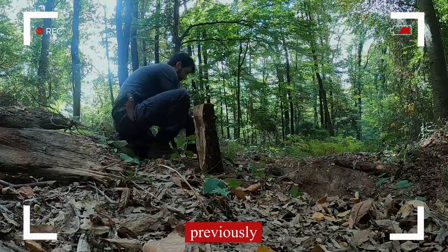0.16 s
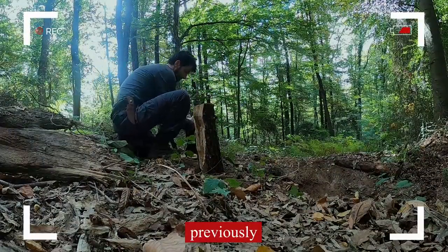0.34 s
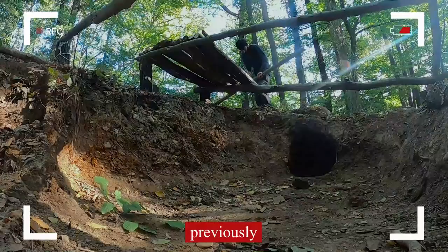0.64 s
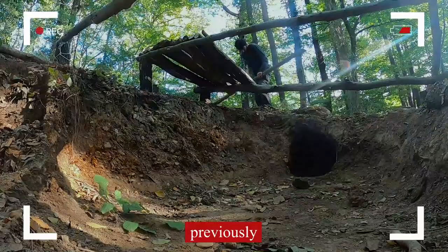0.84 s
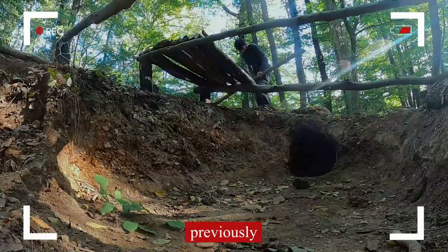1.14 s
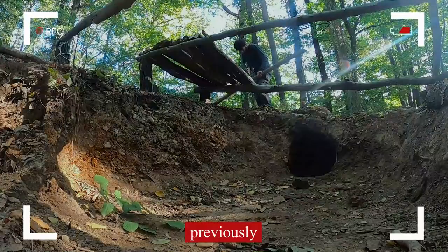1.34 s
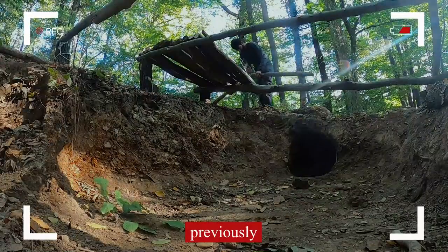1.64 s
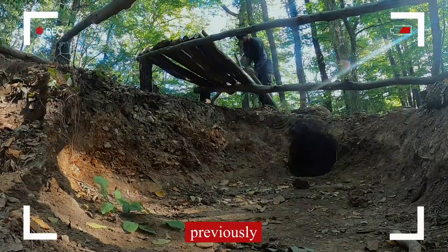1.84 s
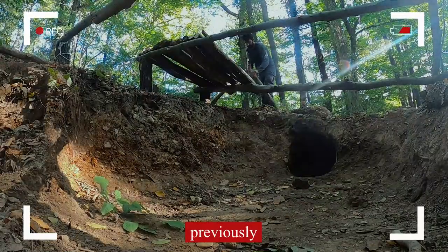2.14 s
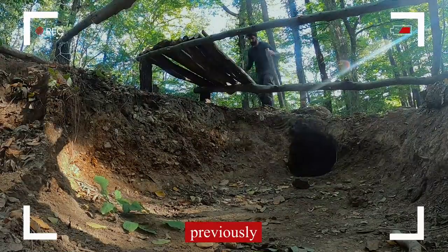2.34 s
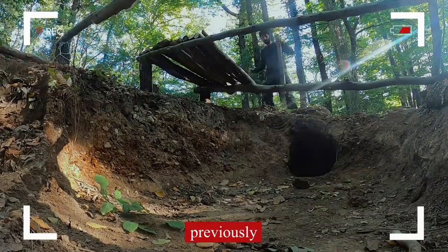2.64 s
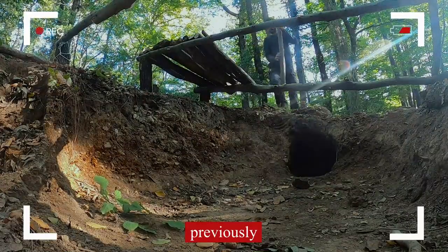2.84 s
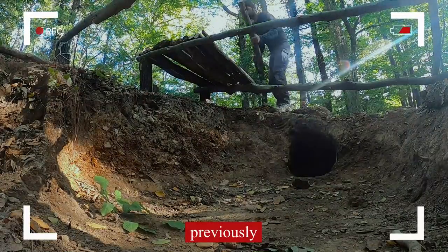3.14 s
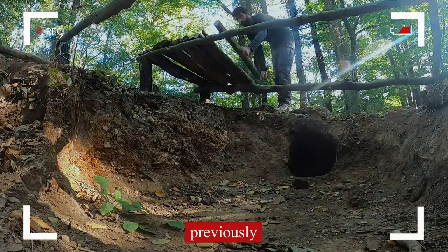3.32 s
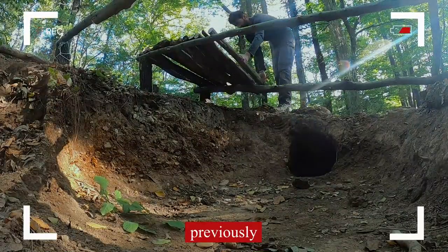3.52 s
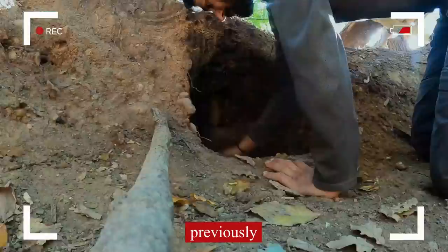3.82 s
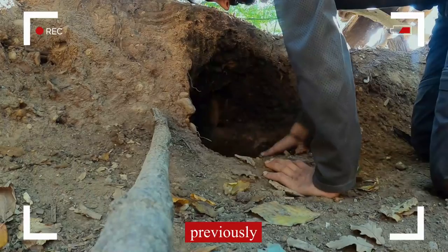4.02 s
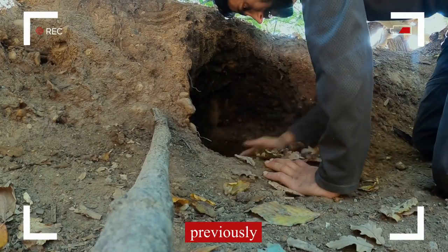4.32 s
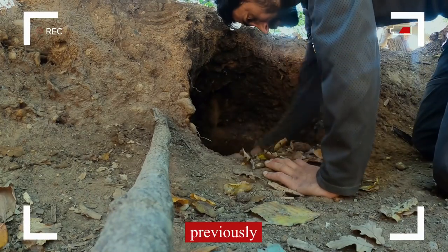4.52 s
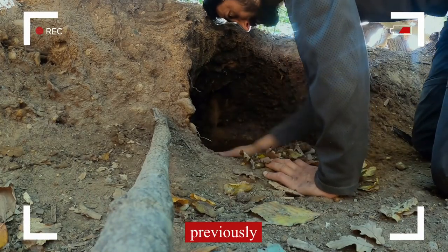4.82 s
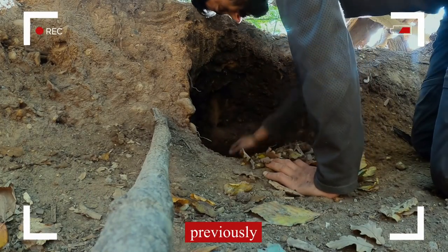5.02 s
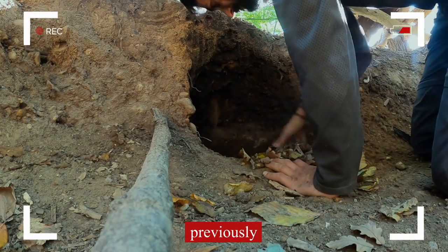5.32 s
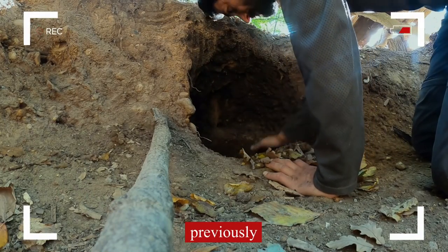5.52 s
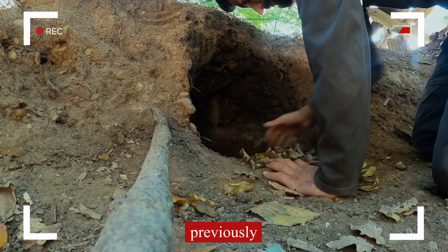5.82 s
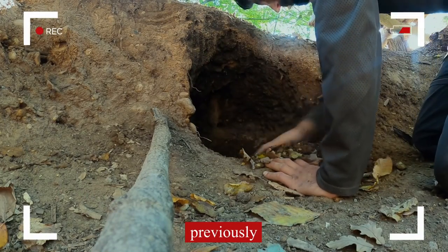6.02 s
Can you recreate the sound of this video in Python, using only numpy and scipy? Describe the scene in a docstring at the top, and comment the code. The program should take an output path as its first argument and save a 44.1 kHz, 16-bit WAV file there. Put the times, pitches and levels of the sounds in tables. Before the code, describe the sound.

After one dull thud come rhythmic gritty scrapes on a stick, wind slaps and wooden knocks, then close crackling scoops of leaves and earth.

```python
"""Forest, at a dug shelter: a log thuds down, then a blade scrapes to and fro over a stick in torn-fibre grit
while a breeze rumbles and slaps the left microphone port; a footfall and soft dull taps are damped modes too.
Poles knock on a wooden frame as damped modes plus a noise crack. Then, close by, a hand scoops dry leaves and
soil out of an earth hollow: clustered grit, snaps and dropping clods. Coloured noise gives the air of each place."""
import sys
import numpy as np
from scipy import signal
from scipy.fft import rfft, irfft
from scipy.io import wavfile
from scipy.ndimage import uniform_filter1d

SR = 44100
rng = np.random.default_rng(int(sys.argv[2]) if len(sys.argv) > 2 else 0)


def wav_record(signal):
    """Record a signal, one row per channel, as 16-bit PCM in the file named by sys.argv[1]."""
    frames = np.transpose(np.atleast_2d(signal))
    bounded = np.clip(frames, -1, 1)
    # unit amplitude maps onto the largest positive 16-bit level
    quanta = np.round(bounded * 32767).astype(np.int16)
    wavfile.write(sys.argv[1], SR, quanta)


N = 271598
TIME_S = np.arange(N) / SR

# levels are relative within each layer; colours are per Hz
# blade strokes, push and return: t/s, push level/dB, return level/dB, length/s
STROKE_ROWS = [(0.568, -29, -39.5, 0.028), (0.707, -34.5, -47, 0.03), (0.854, -31, -40.5, 0.028),
               (0.995, -31.5, -37, 0.031), (1.136, -33.5, -41.5, 0.031), (1.28, -32.5, -36.5, 0.03),
               (1.435, -28.5, -34.5, 0.026), (1.584, -37, -55, 0.025), (1.73, -34.5, -49, 0.027),
               (1.951, -45, -47, 0.023), (2.128, -37, -46.5, 0.019), (2.28, -42, -63, 0.02)]
# rub between strokes: t/s, level/dB
DRAG_ROWS = [(0.56, -51.5), (1.2, -56.5), (1.4, -51), (1.7, -47.5), (1.76, -62), (2.1, -54.5), (2.35, -68)]
# blade hiss colour: f/Hz, level/dB
BLADE_COLOUR = [(1500, -38), (2600, -10.5), (3600, -3.5), (4300, 2), (5100, 4.5), (5700, 0), (6400, 3.5),
                (7200, -1), (9000, -1), (11000, 0.5), (12500, -7.5), (16000, -21)]
# resonances of blade and stick: f/Hz, level/dB
RING_COLOUR = [(1000, -26), (1220, -13), (1390, -3), (1560, -11.5), (2600, -24), (3200, -11), (3580, -2),
               (4100, -4), (6000, -23.5)]
# stick body colour: f/Hz, level/dB
STICK_COLOUR = [(250, -2), (380, 2), (600, -3), (760, 6.5), (850, 6), (1050, -0.5), (1280, -5), (1550, -4),
                (2000, -4), (2700, -11), (4000, -20)]
# faint rustles by the frame, then hand sweeps through leaves and soil: t/s, level/dB, length/s
SWEEP_ROWS = [(2.687, -50, 0.084), (2.942, -57.5, 0.15), (3.18, -55, 0.093), (3.887, -46.5, 0.025),
              (3.944, -36, 0.025), (4.029, -43, 0.032), (4.116, -48, 0.028), (4.195, -49.5, 0.029),
              (4.288, -44.5, 0.031), (4.409, -46, 0.029), (4.446, -45.5, 0.037), (4.718, -39, 0.038),
              (4.766, -54.5, 0.064), (4.833, -54, 0.037), (4.902, -60, 0.048), (5.022, -56.5, 0.053),
              (5.157, -56.5, 0.049), (5.258, -48.5, 0.025), (5.471, -52, 0.022), (5.645, -62, 0.04),
              (5.74, -63, 0.06), (5.846, -58.5, 0.051), (5.93, -43.5, 0.056), (6.05, -50.5, 0.068),
              (6.146, -44, 0.057)]
# rustle of a dragged handful of leaves: t/s, level/dB
HANDFUL_ROWS = [(3.87, -56), (4.25, -61), (4.32, -49), (4.39, -59), (4.5, -54.5), (4.68, -54.5), (4.8, -59),
                (4.95, -77), (5.4, -63.5), (6.15, -68)]
# dry leaf colour: f/Hz, level/dB
LEAF_COLOUR = [(500, -3), (1200, -6.5), (2300, -2.5), (3300, -5), (5200, 0.5), (7500, -0.5), (10500, 0.5),
               (13000, 0.5), (16000, -7)]
# soil rub colour: f/Hz, level/dB
SOIL_COLOUR = [(200, -1.5), (400, 4.5), (800, 6.5), (1100, -9), (1450, -7), (2100, -13.5), (3200, -18.5),
               (6000, -12)]
# snapping fibres and leaf stalks: t/s, level/dB
SNAP_ROWS = [(0.5623, -12.5), (0.762, -17.5), (0.9851, -15), (1.1154, -18.5), (1.1834, -25), (1.5579, -29),
             (1.615, -31), (1.8598, -23), (1.8896, -21.5), (2.018, -31), (2.078, -29), (3.9355, -28),
             (4.2334, -30.5), (4.5484, -27.5), (4.6646, -29), (5.2131, -37), (6.0428, -26)]
# dropping crumbs and pats on the ground: t/s, level/dB
CLOD_ROWS = [(1.881, -40.5), (2.079, -34), (4.161, -38), (4.382, -36), (4.624, -41), (4.898, -40),
             (5.034, -36), (5.283, -39.5), (5.379, -41), (5.816, -45), (5.969, -44), (6.095, -43)]
# pat on packed earth, colour: f/Hz, level/dB
EARTH_COLOUR = [(200, -7), (420, -5), (680, 9), (900, -4), (1100, -7), (1450, -12), (2100, -17),
                (3200, -24), (6000, -22)]
# pole on frame: t/s, level/dB, pitch factor, crack level/dB, low-mode level/dB, contact cutoff f/Hz
KNOCK_ROWS = [(1.8911, -33, 0.8, 4, -18, 3000), (2.384, -38.5, 0.77, 5.5, -7, 3970),
              (2.427, -18.5, 0.73, 0.5, 1, 1500), (3.498, -23.5, 1.0, 2, 9, 2500),
              (3.509, -29.5, 1, 0, 3, 6000), (3.5223, -5.5, 0.97, -5.5, -3.5, 3370),
              (3.7405, -27.5, 1.0, 5, 5, 9000), (3.769, -26, 0.79, 4.5, -20, 12000),
              (3.776, -17, 0.93, -0.5, 6.5, 12200), (3.7806, -11, 1.03, -8.5, -3, 2600)]
# pole modes at pitch factor 1: f/Hz, level/dB, t60/s
POLE_MODES = [(237, -4, 0.061), (370, -17, 0.092), (540, -11, 0.034), (757, -3, 0.024), (783, -8, 0.05),
              (844, -4.5, 0.038), (1060, -2, 0.006), (1430, -20, 0.018), (1720, -9, 0.032), (1980, 0, 0.04),
              (2002, 5, 0.011), (2400, -21, 0.033), (2950, -12.5, 0.022), (3440, -10.5, 0.03),
              (3750, -4.5, 0.012), (4550, -40, .016), (4970, -25, 0.023)]
# contact crack colour: f/Hz, level/dB
CRACK_COLOUR = [(200, -0.5), (800, 7.5), (3700, -9.0), (4500, -8.5), (9000, -14), (16000, -10)]
# a log thud, then a footfall and soft dull taps: t/s, level/dB, pitch factor, tick level/dB
THUD_ROWS = [(0.1505, -10.5, 1.02, -16.5), (2.1907, -23.5, 1.85, -17), (2.3904, -27.5, 1.12, -30),
             (3.172, -27, 1.47, -18)]
# thud modes at pitch factor 1: f/Hz, level/dB, t60/s
THUD_MODES = [(163, -11, 0.043), (255, -1, 0.034), (322, -7, 0.041), (426, -7.5, 0.025),
              (840, -19.5, 0.025), (1550, -38, 0.014)]
# thud tick colour: f/Hz, level/dB
TICK_COLOUR = [(500, 9), (2000, 4.5), (2600, -2.5), (6000, -4.0), (16000, -15)]
# air slaps on the left port: t/s, level/dB, swing f/Hz
BUFFET_ROWS = [(1.383, -5, 149), (1.408, -14.5, 180), (1.513, -11, 142), (1.558, -9.5, 119),
               (1.974, -5, 152), (1.989, -6.5, 129), (1.997, -11, 190), (2.028, -9, 192),
               (2.192, -9.5, 204), (2.337, -13, 130), (2.389, -8.5, 172)]
# slap colour: f/Hz, level/dB
SLAP_COLOUR = [(100, -1), (400, 5.5), (700, -3.0), (2000, -43.0)]
# gusts on the ports: t/s, level/dB, length/s
GUST_ROWS = [(1.41, -29.5, 0.24), (1.57, -29.5, 0.23), (1.82, -31, 0.085), (2.0, -29, 0.13),
             (2.19, -27, 0.18), (2.4, -29, 0.087), (2.6, -38.5, 0.077), (2.9, -40, 0.068), (3.5, -41, 0.08),
             (3.715, -31.5, 0.088)]
# wind rumble colour: f/Hz, level/dB
WIND_COLOUR = [(20, -40), (45, -2), (80, 3.5), (130, 2), (200, 1.5), (300, -6), (500, -27), (1000, -37),
               (2500, -46)]
# air by the log, colour: f/Hz, level/dB
FOREST_COLOUR = [(18, -50), (30, -17), (225, 6), (996, -9.5), (1170, -10), (1290, -11), (2070, -16.5),
                 (2550, -21.5), (3880, -17), (5310, -17.5), (8280, -17), (11600, -20.5), (15500, -25)]
# air by the frame, colour: f/Hz, level/dB
FRAME_COLOUR = [(18, -19), (30, -32), (81, -1.5), (197, -1.5), (237, -5.5), (277, -9.5), (307, -11.5),
                (467, -15.5), (787, -23), (1020, -27), (1770, -36), (2360, -43.5), (3980, -38),
                (15500, -42)]
# air in the hollow, colour: f/Hz, level/dB
HOLLOW_COLOUR = [(18, -62), (30, -20.5), (77, -13.5), (140, 0.5), (237, -0.5), (369, -6.5), (505, -18),
                 (874, -20.5), (1110, -30), (1330, -24.5), (1720, -35), (2760, -40.5), (3590, -44),
                 (7460, -40), (15500, -44)]
# low rumble around the frame: t/s, level/dB
RUMBLE_ROWS = [(.56, -38.5), (.85, -39), (1.0, -45), (1.2, -43.5), (1.45, -39.5), (1.9, -45.5), (2.5, -44),
               (3.05, -43), (3.86, -41.5)]
# dull rumble of movement in the hollow: t/s, level/dB
STIR_ROWS = [(3.88, -44), (4.4, -48.5), (4.56, -44.5), (4.75, -45), (5.0, -47), (5.15, -44), (5.82, -44.5),
             (5.93, -41.5), (6.15, -44.5)]
# side against mid, close sources: f/Hz, level/dB
PORT_WIDTH = [(60, -8), (250, -21), (1200, -23), (2400, -33), (4400, -3.5), (8000, -6.5), (15000, 2)]
# side against mid, background: f/Hz, level/dB
BACKGROUND_WIDTH = [(60, -17), (200, -28), (380, -24), (700, -15.5), (1300, -14.5), (2400, -15), (4400, -6),
                    (8000, -3), (15000, -2.5)]
# width of the background air: t/s, level/dB
AIR_WIDTH_ROWS = [(3.86, 3.5), (3.9, -33), (4.4, -7), (4.9, -2.5), (6.1, 2.5)]

FRAME_S, HOLLOW_S = 0.555, 3.87  # start by the frame, start in the hollow
TOP_HZ = 16000
STROKE_RISE, RETURN_RISE, SWEEP_RISE, GUST_RISE = 0.62, 0.53, 0.35, 0.44  # share of length spent swelling
RETURN_S, RETURN_STRETCH = 0.064, 0.85  # return delay after push; return length / push length
STICK_PUSH_DB, STICK_RETURN_DB = -8, -13.5  # wood envelope re blade
RING_DB, RING_FOLLOW = -19.5, 0.71  # ring at a 0 dB stroke; dB of ring per dB of stroke
SOIL_DB, SOIL_FOLLOW = -42, 0.2  # soil at a 0 dB sweep; dB of soil per dB of leaves
HANDFUL_SOIL_DB = -2  # soil re handful rustle
BUFFET_T60_S, LULL_DB = 0.019, -59.5  # slap decay; breeze between gusts


def undb(db):
    """Decibels to gain."""
    return 10 ** (np.asarray(db) / 20)


def unit(x):
    """Scale to rms 1."""
    return x / np.sqrt(np.mean(x ** 2))


def curve(rows):
    """Gain interpolated in dB along (t/s, level/dB) rows."""
    return undb(np.interp(TIME_S, *np.transpose(rows)))


def colour(x, points):
    """Minimum-phase filter through (f/Hz, level/dB) points, built by cepstral folding."""
    hz, db = np.transpose(points)
    size = 4096
    grid_hz = np.maximum(np.fft.rfftfreq(size, 1 / SR), 1)
    gain = undb(np.interp(np.log(grid_hz), np.log(hz), db))
    cepstrum = irfft(np.log(gain))
    cepstrum[1:size // 2] *= 2
    cepstrum[size // 2 + 1:] = 0
    impulse = irfft(np.exp(rfft(cepstrum)))
    return signal.fftconvolve(x, impulse)[:len(x)]


def high_pass(x, cutoff_hz):
    """Second-order bass cut."""
    return signal.sosfilt(signal.butter(2, cutoff_hz, "high", fs=SR, output="sos"), x)


def walk(rate_hz):
    """Smoothed random steps, rms 1."""
    step = max(int(SR / rate_hz), 1)
    held = np.repeat(rng.standard_normal(N // step + 1), step)
    return unit(uniform_filter1d(held, step)[:N])


def add(track, t_s, sound):
    """Mix a sound into a track at t_s."""
    i = int(t_s * SR)
    track[i:i + len(sound)] += sound[:N - i]


def fade(t60_s, length_s=0.17):
    """Exponential decay."""
    return undb(-60 * TIME_S[:int(length_s * SR)] / t60_s)


def ring(hz, t60_s):
    """One struck mode: a decaying sine."""
    decay = fade(t60_s)
    return decay * np.sin(2 * np.pi * hz * TIME_S[:len(decay)])


def burst(t60_s):
    """Decaying white noise."""
    decay = fade(t60_s)
    return decay * rng.standard_normal(len(decay))


def clicks(rate_hz, spread_db):
    """Random impulses of uneven size and sign, rms 1."""
    out = np.zeros(N)
    at = np.flatnonzero(rng.random(N) < rate_hz / SR)
    out[at] = undb(spread_db * np.clip(rng.standard_normal(N)[at], -2, 2))
    return unit(out * rng.choice([-1, 1], N))


def grit(rate_hz, spread_db, patchy_db, shared):
    """Fractures: broad clicks (gain shared) plus clicks ringing briefly in bands that wax and wane."""
    edges_hz = np.geomspace(1500, 18000, num=19) - 1350
    rings = np.zeros(N)
    for band_hz in zip(edges_hz[:-1], edges_hz[1:]):
        band_pass = signal.butter(2, band_hz, "band", fs=SR, output="sos")
        ringing = signal.sosfilt(band_pass, clicks(rate_hz / 3, spread_db))
        rings += ringing * undb(patchy_db * walk(70))
    return unit(unit(rings) + shared * clicks(rate_hz, spread_db))


def swells(rows, rise_share):
    """Gain of (t/s, level/dB, length/s) movements that swell and die; overlaps add in power."""
    power = np.zeros(N)
    for t_s, db, length_s in rows:
        d = (TIME_S - t_s) / length_s
        near = np.abs(d) < 4
        d = d[near]
        width = np.where(d < 0, rise_share, 1 - rise_share)
        power[near] += undb(db) ** 2 * np.exp(-2 * np.abs(d / width) ** 1.5)
    return np.sqrt(power)


def ports(mid, width_db, lag_samples):
    """Left port trails the right; a scattered side signal sets them apart, mostly in the treble."""
    delay = -lag_samples / 2 * np.gradient(mid)
    scatter = colour(mid * walk(500), PORT_WIDTH) * undb(width_db)
    side = delay + scatter
    return np.array([mid + side, mid - side])


def scraping():
    """Blade tears fibres in quick catches; steel hisses, blade and stick ring, wood sounds under it."""
    pushes = [(t_s, db, length_s) for t_s, db, _, length_s in STROKE_ROWS]
    returns = [(t_s + RETURN_S, db, length_s * RETURN_STRETCH) for t_s, _, db, length_s in STROKE_ROWS]
    push, back = swells(pushes, STROKE_RISE), swells(returns, RETURN_RISE)
    drag = curve(DRAG_ROWS) * (TIME_S < DRAG_ROWS[-1][0])
    bright = np.hypot(push, back)
    dull = np.hypot(push * undb(STICK_PUSH_DB), back * undb(STICK_RETURN_DB))
    fibres = grit(rate_hz=2600, spread_db=3.5, patchy_db=3.5, shared=1.0) * undb(1.4 * walk(350))
    steel = unit(colour(fibres, BLADE_COLOUR)) * np.hypot(bright, drag)
    # light strokes ring relatively more
    ringing = unit(colour(fibres, RING_COLOUR)) * bright ** RING_FOLLOW * undb(RING_DB)
    wood_grit = grit(rate_hz=1500, spread_db=1.0, patchy_db=4.5, shared=0.41)
    wood = unit(colour(wood_grit, STICK_COLOUR)) * dull * undb(2.5)
    return ports((steel + ringing + wood) * (TIME_S > FRAME_S), width_db=-7.0, lag_samples=1.0)


def scooping():
    """Faint rustles, then scoops: leaves crackle in clusters, soil grains rub much alike in every sweep."""
    in_hollow = TIME_S > HOLLOW_S
    handful = curve(HANDFUL_ROWS) * in_hollow
    bright = np.hypot(swells(SWEEP_ROWS, SWEEP_RISE), handful)
    rubs = [(t_s, SOIL_DB + SOIL_FOLLOW * db, length_s) for t_s, db, length_s in SWEEP_ROWS]
    dull = np.hypot(swells(rubs, SWEEP_RISE), handful * undb(HANDFUL_SOIL_DB))
    clusters = unit(undb(2.0 * walk(200)))
    crackle = grit(rate_hz=1100, spread_db=5.0, patchy_db=2.5, shared=0.6)
    leaves = unit(colour(crackle * clusters, LEAF_COLOUR)) * bright * undb(0.25)
    grains = grit(rate_hz=1500, spread_db=6.0, patchy_db=3.5, shared=0.68)
    soil = unit(colour(grains, SOIL_COLOUR)) * dull * undb(1.0)
    # constant bed of sparse clicks in the hollow, too faint to hear
    sparse = grit(rate_hz=72, spread_db=-3.0, patchy_db=-2.0, shared=0.65)
    click_bed = unit(colour(sparse, LEAF_COLOUR)) * in_hollow * undb(-77)
    return ports(leaves + soil + click_bed, width_db=-8.5, lag_samples=0.064)


def knocks():
    """Each blow cracks at the contact and rings the pole; a softer contact (lower cutoff) dulls both."""
    out = np.zeros(N)
    for t_s, db, pitch, crack_db, low_db, cutoff_hz in KNOCK_ROWS:
        body = 0
        for k, (hz, mode_db, t60_s) in enumerate(POLE_MODES):
            mode = ring(hz * pitch * rng.normal(1, 0.0068), t60_s)
            body = body + (-1) ** (k // 2) * mode * undb(mode_db + low_db * (hz < 400))
        crack = colour(burst(0.033), CRACK_COLOUR)
        contact = signal.butter(1, cutoff_hz, fs=SR)
        blow = signal.lfilter(*contact, undb(-7.0) * body + undb(crack_db) * crack)
        add(out, t_s, undb(db) * blow)
    return ports(out, width_db=-3.5, lag_samples=0.99)


def ticks(rows, points, rise_s, t60_s, level_db):
    """Short crumbling contacts: coloured noise bursts, each scaled to its own peak."""
    out = np.zeros(N)
    for t_s, db in rows:
        crumble = burst(t60_s)
        onset = 1 - np.exp(-TIME_S[:len(crumble)] / rise_s)
        tick = colour(crumble * onset, points)
        add(out, t_s, tick / np.abs(tick).max() * undb(db + level_db))
    return ports(out, width_db=-6.5, lag_samples=0.18)


def snaps():
    """Fibres and leaf stalks break in sharp bright ticks."""
    return ticks(SNAP_ROWS, LEAF_COLOUR, rise_s=0.00047, t60_s=0.019, level_db=-7.5)


def clods():
    """Crumbs drop and fingers pat packed earth: slower, duller ticks."""
    return ticks(CLOD_ROWS, EARTH_COLOUR, rise_s=0.0017, t60_s=0.076, level_db=2.0)


def thuds():
    """A log thud, then a footfall and soft dull taps: each a small noise tick and a few damped modes."""
    out = np.zeros(N)
    for t_s, db, pitch, tick_db in THUD_ROWS:
        body = 0
        for k, (hz, mode_db, t60_s) in enumerate(THUD_MODES):
            body = body + (-1) ** (k // 2) * undb(mode_db) * ring(hz * pitch, t60_s)
        tick = colour(burst(0.02), TICK_COLOUR)
        add(out, t_s, undb(db) * (body + undb(tick_db) * tick))
    return ports(high_pass(out, 130), width_db=-8.0, lag_samples=0.84)


def wind_rumble():
    """Eddies at one port: low noise of uneven strength, before gusts."""
    return unit(colour(rng.standard_normal(N), WIND_COLOUR) * undb(4.9 * walk(45)))


def breeze():
    """Eddies rumble on and slap the exposed left port; the sheltered right has weak eddies of its own."""
    slaps = np.zeros(N)
    for t_s, db, hz in BUFFET_ROWS:
        add(slaps, t_s, undb(db) * ring(hz, BUFFET_T60_S))
    slaps = high_pass(colour(slaps, SLAP_COLOUR), 69)
    exposed = (TIME_S > FRAME_S) & (TIME_S < HOLLOW_S)
    strength = exposed * np.hypot(swells(GUST_ROWS, GUST_RISE), undb(LULL_DB))
    left, right = wind_rumble() * strength, wind_rumble() * strength
    return np.array([left + slaps, right * undb(-10.5)])


def air(points):
    """Outdoor noise bed, split at 900 Hz into a steady hiss and a wavering rumble."""
    bed = unit(colour(rng.standard_normal(N), points))
    low = signal.sosfiltfilt(signal.butter(2, 900, fs=SR, output="sos"), bed)
    return bed - low, low * undb(1.4 * walk(25))


def ambience():
    """Air by the log, by the frame, then in the hollow, where movement stirs the bass."""
    by_log = sum(air(FOREST_COLOUR)) * undb(-52.5) * (TIME_S < FRAME_S)
    hiss, rumble = air(FRAME_COLOUR)
    by_frame = hiss * undb(-39.5) + rumble * curve(RUMBLE_ROWS)
    by_frame = by_frame * (TIME_S >= FRAME_S) * (TIME_S < HOLLOW_S)
    hiss, rumble = air(HOLLOW_COLOUR)
    in_hollow = (hiss * undb(-42.5) + rumble * curve(STIR_ROWS)) * (TIME_S >= HOLLOW_S)
    return by_log + by_frame + in_hollow


def background():
    """Independent mid and side air; the width collapses on entering the hollow, then reopens."""
    mid = ambience()
    side = colour(ambience(), BACKGROUND_WIDTH) * curve(AIR_WIDTH_ROWS)
    return np.array([mid + side, mid - side])


def scene():
    """All sources at the two ports."""
    work = scraping() + scooping() + knocks() + snaps() + clods() + thuds()
    return work + breeze() + background()


def record(dry):
    """Steep elliptic low-pass cuts the top."""
    return signal.sosfilt(signal.ellip(10, 0.2, 80, TOP_HZ, fs=SR, output="sos"), dry)


dry = scene()
out = record(dry)
wav_record(out)
```